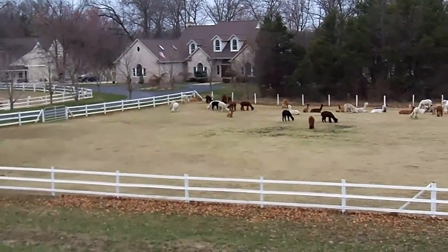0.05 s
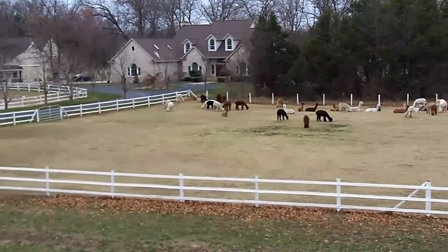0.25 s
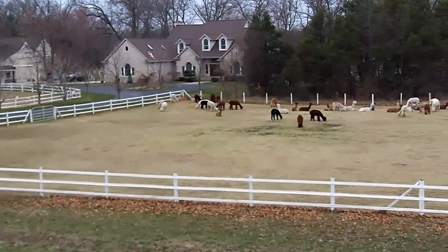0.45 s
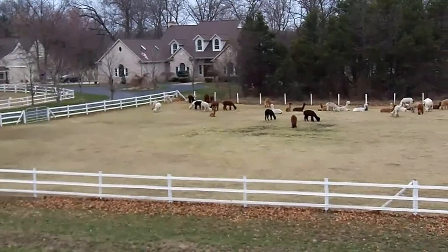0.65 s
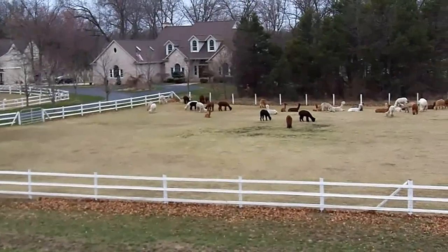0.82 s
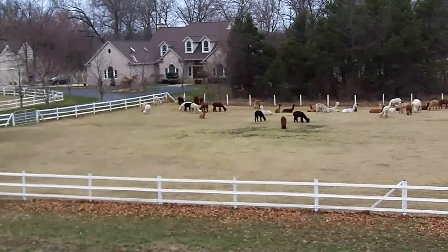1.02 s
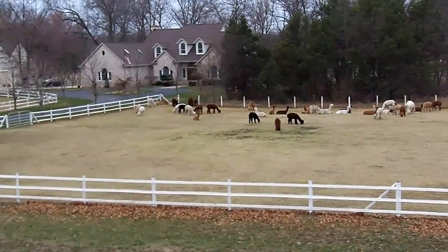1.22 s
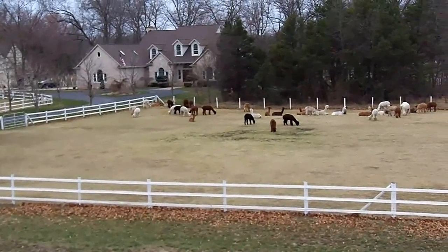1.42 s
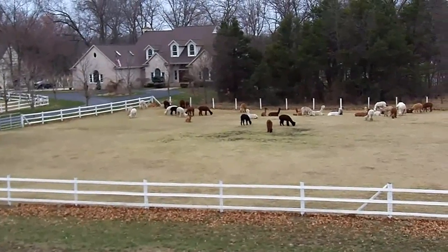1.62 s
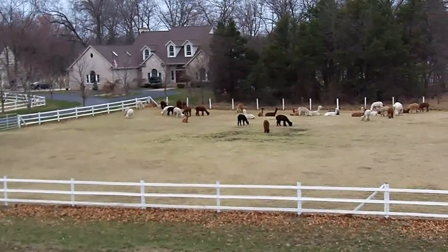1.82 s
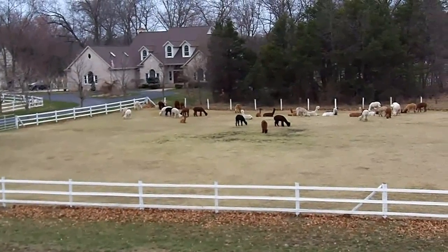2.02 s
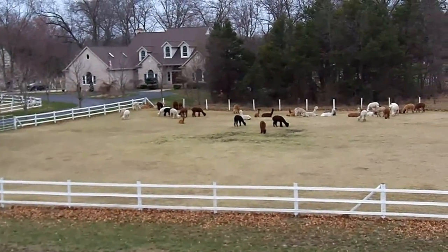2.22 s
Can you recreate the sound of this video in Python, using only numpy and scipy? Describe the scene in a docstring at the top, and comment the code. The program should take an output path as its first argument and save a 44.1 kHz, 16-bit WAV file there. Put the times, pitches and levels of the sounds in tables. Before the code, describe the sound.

Light wind rumbles and thumps on the microphone while distant birds faintly whistle and chirp.

```python
"""Breezy pasture with small birds.

Out in a quiet pasture, soft gusts bump the microphone and single eddies thump it.
Small birds whistle, slur, peep and chip from the tree line; branches smear their notes
and the trunks answer with a faint echo. Air rushes steadily over the far fields.
Right at the microphone, the camera adds its own hiss and a thin high whine."""
import sys
import numpy as np
from scipy import signal
from scipy.fft import rfft, irfft
from scipy.io import wavfile
from scipy.ndimage import uniform_filter1d

SR = 44100
rng = np.random.default_rng(int(sys.argv[2]) if len(sys.argv) > 2 else 0)


def master_out(mix):
    """Clip the mix to full scale and print it as 16-bit PCM to the path in sys.argv[1]."""
    frames = np.transpose(np.atleast_2d(mix))
    ceiling = np.clip(frames, -1, 1)
    pcm = np.round(ceiling * 32767).astype(np.int16)
    wavfile.write(sys.argv[1], SR, pcm)


N = 103635
TIME = np.arange(N) / SR


def from_db(db):
    """Decibels to gain."""
    return 10 ** (np.asarray(db) / 20)


def rms_one(x):
    """Scale to unit rms."""
    return x / np.sqrt(np.mean(x ** 2) + 1e-20)


def level(rows):
    """Gain over time from (time [s], level [dB]) points."""
    return from_db(np.interp(TIME, *np.transpose(rows)))


def bump(centre, width):
    """A smooth swell of height 1."""
    return np.exp(-((TIME - centre) / width) ** 2)


def since(start, length):
    """Seconds into a note, held outside it."""
    return np.clip(TIME - start, 0, length)


def drift(rate):
    """Smooth random motion with spread 1, slower than about `rate` Hz."""
    step, settle = 40, 2000
    pole = np.exp(-2 * np.pi * rate * step / SR)
    white = rng.standard_normal(N // step + settle + 2)
    slow = signal.lfilter([1], [1, -2 * pole, pole * pole], white)[settle:]
    return np.interp(np.arange(N) / step, np.arange(len(slow)), rms_one(slow))


def noise(spectrum):
    """Unit noise coloured by (frequency [Hz], relative level [dB]) points, rolled off below 14 Hz."""
    hz, db = np.transpose(spectrum)
    f = np.fft.rfftfreq(N, 1 / SR) + 1e-6
    gain = from_db(np.interp(np.log(f), np.log(hz), db)) / np.sqrt(1 + (14 / f) ** 4)
    return rms_one(irfft(rfft(rng.standard_normal(N)) * gain, N))


def eddies(spectrum):
    """Low turbulence with its chance swells evened out."""
    flow = noise(spectrum)
    return flow / np.sqrt(uniform_filter1d(flow ** 2, size=2400) + 1e-9)


def reflections(x, delay, t60):
    """Dense random reflections that begin after a delay and die away, at the power of the source."""
    tail = rng.standard_normal(N) * from_db(-60 * TIME / t60) * (TIME > delay)
    return signal.fftconvolve(x, tail / np.sqrt(np.sum(tail ** 2)))[:N]


# gusts right on the microphone: (time [s], level [dB])
GUSTS = [(0, -53), (.33, -54.5), (.45, -44.5), (.52, -50.5), (.66, -56), (.74, -45), (.87, -43.5),
         (.93, -50.5), (1.08, -55.5), (1.27, -48.5), (1.47, -49), (1.65, -53), (1.76, -47.5), (2.2, -56),
         (2.35, -54.5)]
# colour of their buffeting: (frequency [Hz], relative level [dB])
GUST_COLOUR = [(15, 3), (28, 1.5), (45, -7), (65, -8.5), (100, -14.5), (170, -27.5), (350, -42),
               (6000, -100)]

def wind():
    """Turbulence on the microphone rises and falls with the gusts."""
    return level(GUSTS) * eddies(GUST_COLOUR)


# single eddies striking the microphone: (time [s], half-width [s], level [dB])
THUMPS = [(0.429, 0.007, -36), (0.771, 0.0034, -38), (0.829, 0.0086, -22), (0.861, 0.0086, -27),
          (1.187, .009, -31.5), (1.284, 0.005, -31.5), (1.364, 0.01, -31), (1.791, 0.0088, -36.5),
          (2.32, 0.0047, -41)]
# rough flow around them: (frequency [Hz], relative level [dB])
WAKE_COLOUR = [(30, -13), (60, 5.5), (110, -10), (200, -23), (600, -26), (6000, -95)]

def thumps(low_cut_hz=12.6, wake_db=-20, wake_s=0.022):
    """Each large eddy is a dip in pressure amid rough flow; the microphone's bass cut makes it rebound."""
    suction = -sum(from_db(db) * bump(at, width) for at, width, db in THUMPS)
    wake = sum(from_db(db + wake_db) * bump(at, wake_s) for at, _, db in THUMPS)
    bass_cut = signal.butter(2, low_cut_hz, "high", fs=SR, output="sos")
    return signal.sosfilt(bass_cut, suction + 1e-18) + wake * eddies(WAKE_COLOUR)


def note(start, length, hz, db, waver_hz, waver_rate, attack=0.0049, release=0.0049):
    """One bird note: a wavering sine on a pitch path, with soft edges."""
    age = TIME - start
    gate = np.clip(np.minimum(age / attack, (length - age) / release), 0, 1)
    phase = 2 * np.pi * np.cumsum(hz + waver_hz * drift(waver_rate)) / SR
    return np.sqrt(2) * from_db(db) * np.sin(gate * np.pi / 2) ** 2 * np.sin(phase)


# whistles from the tree line: (start [s], length [s], pitch [Hz], level [dB])
WHISTLES = [(0.62, 0.12, 3925, -66), (1.082, 0.11, 3800, -65.5), (1.253, 0.066, 3800, -69.5)]

def whistles(sag_hz_per_s=480):
    """Thin, nearly level notes that sag a little in pitch."""
    song = np.zeros(N)
    for start, length, hz, db in WHISTLES:
        pitch = hz - sag_hz_per_s * since(start, length)
        song += note(start, length, pitch, db, waver_hz=14, waver_rate=60, attack=0.017, release=0.028)
    return song


# slurs from the tree line: (start [s], length [s], first pitch [Hz], level [dB])
SLURS = [(1.288, 0.245, 2136, -64.5), (1.734, 0.24, 2005, -66), (2.133, 0.23, 2226, -64)]

def slurs(low_hz=1849, fall_s=0.041, sag_hz_per_s=650, fade_db_per_s=24, dip_db=10):
    """Each slur drops quickly to a low pitch, weakens briefly, then keeps sagging as it fades."""
    song = np.zeros(N)
    for start, length, hz, db in SLURS:
        age = since(start, length)
        pitch = low_hz + (hz - low_hz) * np.exp(-age / fall_s) - sag_hz_per_s * age
        fading_db = db - fade_db_per_s * age - dip_db * bump(start + 0.088, width=0.022)
        song += note(start, length, pitch, fading_db,
                     waver_hz=19, waver_rate=59.6, attack=0.017, release=0.06)
    return song


# peeps from the tree line: (start [s], level [dB])
PEEPS = [(.31, -71), (0.787, -70), (0.942, -70.5), (1.107, -70)]

def peeps(length_s=0.046, first_hz=2050, rise_hz=89):
    """Short, soft notes that rise slightly."""
    song = np.zeros(N)
    for start, db in PEEPS:
        pitch = first_hz + rise_hz * since(start, length_s) / length_s
        song += note(start, length_s, pitch, db, waver_hz=40.5, waver_rate=51)
    return song


# chips from the tree line: (start [s], length [s], first pitch [Hz], last pitch [Hz], level [dB])
CHIPS = [(0.015, 0.03, 4070, 3180, -68.5), (0.183, 0.049, 2650, 2166, -72.5),
         (0.506, .025, 3400, 2790, -71), (.578, 0.023, 2710, 3480, -69), (.58, 0.034, 4700, 6240, -70),
         (0.649, 0.029, 3170, 2170, -67), (0.672, .025, 3260, 2230, -66.5), (0.992, 0.033, 3810, 2220, -67),
         (1.073, 0.023, 2900, 3560, -66), (1.063, 0.029, 3580, 6530, -68), (1.106, .05, 6500, 6600, -75),
         (1.126, 0.035, 3900, 1990, -66), (1.158, .033, 3900, 1900, -66), (1.449, 0.036, 3900, 2440, -71),
         (1.467, 0.035, 3885, 2304, -67.5)]

def chips():
    """Quick sweeps, made raspy by a fast, wide waver in pitch."""
    song = np.zeros(N)
    for start, length, first, last, db in CHIPS:
        pitch = first + (last - first) * since(start, length) / length
        song += note(start, length, pitch, db, waver_hz=299.2, waver_rate=396)
    return song


def branches(call, share):
    """Branches around the birds scatter a share of a call's power; the rest arrives directly."""
    return np.sqrt(1 - share) * call + np.sqrt(share) * reflections(call, delay=0, t60=0.052)


def tree_line(song, echo_db=-6.5):
    """The trunks send a faint, scattered echo across the pasture."""
    return from_db(echo_db) * reflections(song, delay=0.03, t60=1)


# far-off air, as it reaches the microphone: (time [s], level [dB])
RUSH_LEVEL = [(0, -54.5), (.3, -53.5), (.7, -53), (1.5, -52), (2.35, -51)]
# its colour: (frequency [Hz], relative level [dB])
RUSH_COLOUR = [(30, -10), (70, -2.5), (125, 1), (200, -3.5), (340, -6), (600, -11.5), (1000, -16.5),
               (1500, -21.5), (3000, -28), (8000, -36)]

def distant_air():
    """The steady rush from far fields and trees."""
    return level(RUSH_LEVEL) * noise(RUSH_COLOUR)


# the camera's own hiss: (time [s], level [dB])
HISS_LEVEL = [(0, -66.5), (.7, -64), (1.5, -63.5), (2.35, -62.5)]
# its colour: (frequency [Hz], relative level [dB])
HISS_COLOUR = [(500, 6.5), (2000, 4), (3600, 2.5), (5500, 0.5), (9000, -0.5), (13500, -2)]

def camera(whine_hz=7867, whine_db=-79.5, flips_per_s=30):
    """Fine hiss, and a thin electronic whine whose phase flips at a regular rate."""
    flips = (-1) ** np.floor(flips_per_s * TIME)
    whine = np.sqrt(2) * from_db(whine_db) * flips * np.sin(2 * np.pi * whine_hz * TIME)
    return level(HISS_LEVEL) * noise(HISS_COLOUR) + whine


def scene():
    """One microphone in the pasture: wind right on it, birds off in the trees, air far beyond."""
    song = branches(whistles() + slurs() + peeps(), share=0.25)
    song += branches(chips(), share=0.57)
    return (wind() + thumps() + song + tree_line(song) + distant_air() + camera())[None]


def record(dry, cutoff_hz=14000):
    """A steep low-pass cuts off the highest treble."""
    return signal.sosfilt(signal.ellip(12, .1, 80, cutoff_hz, fs=SR, output="sos"), dry)


dry = scene()
out = record(dry)
master_out(out)
```